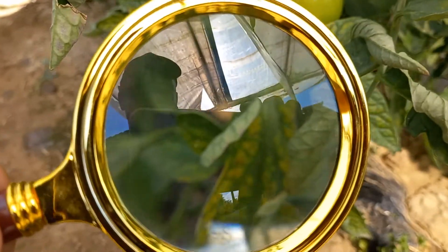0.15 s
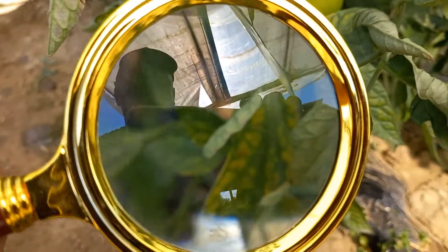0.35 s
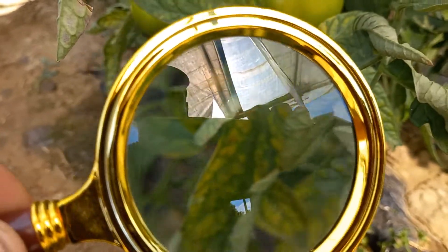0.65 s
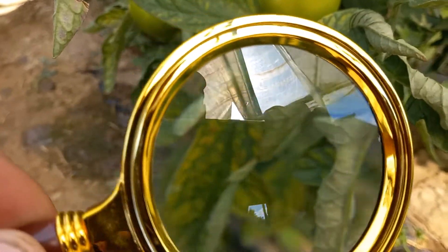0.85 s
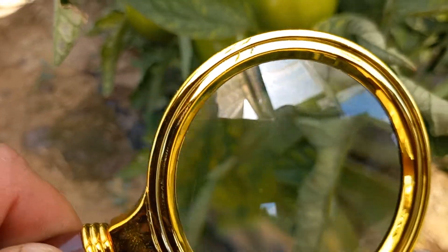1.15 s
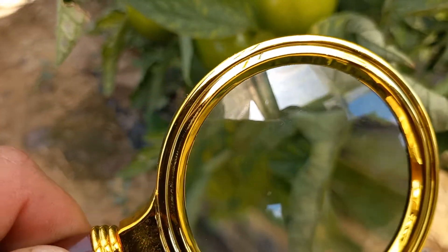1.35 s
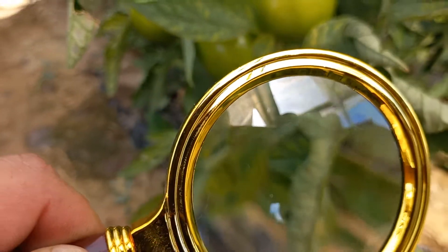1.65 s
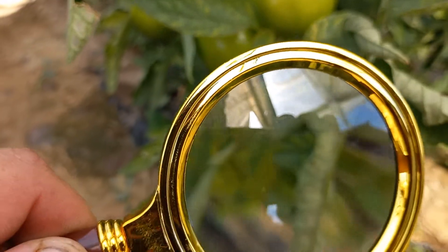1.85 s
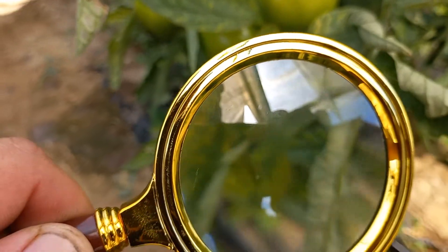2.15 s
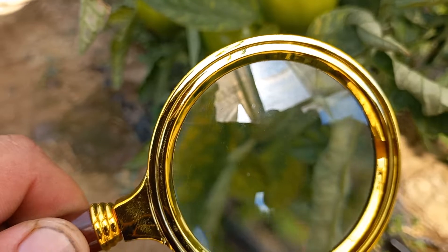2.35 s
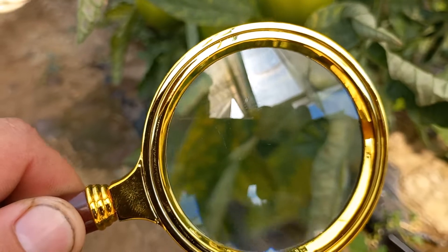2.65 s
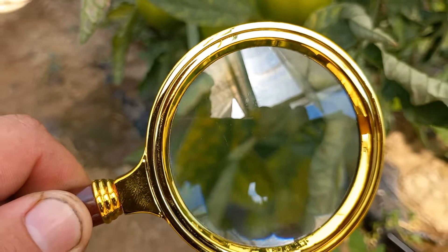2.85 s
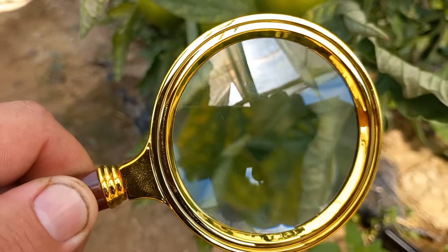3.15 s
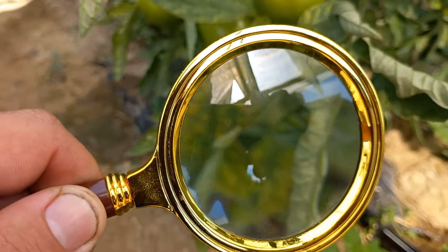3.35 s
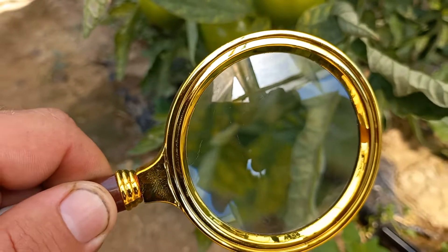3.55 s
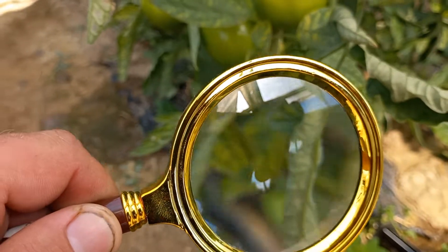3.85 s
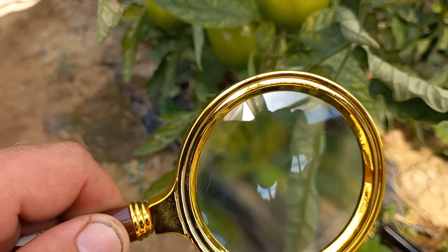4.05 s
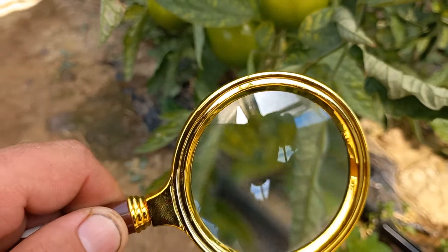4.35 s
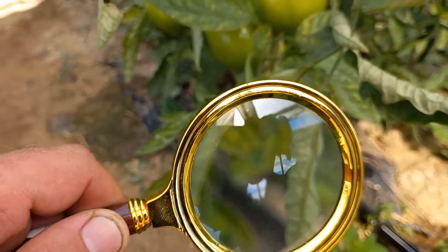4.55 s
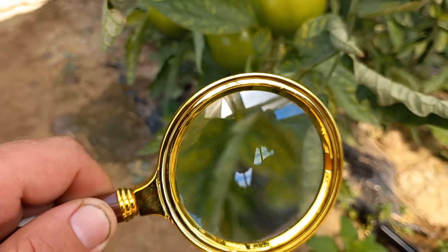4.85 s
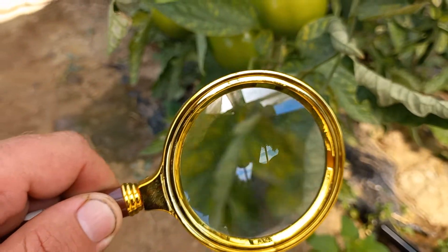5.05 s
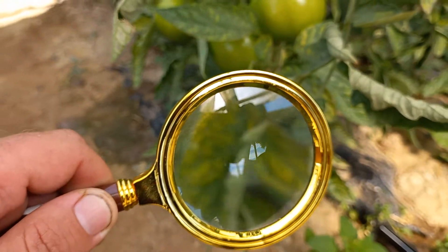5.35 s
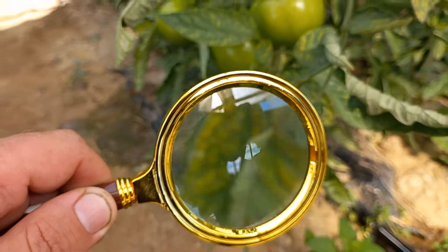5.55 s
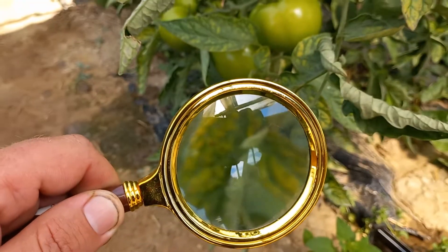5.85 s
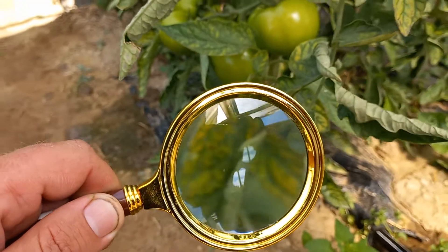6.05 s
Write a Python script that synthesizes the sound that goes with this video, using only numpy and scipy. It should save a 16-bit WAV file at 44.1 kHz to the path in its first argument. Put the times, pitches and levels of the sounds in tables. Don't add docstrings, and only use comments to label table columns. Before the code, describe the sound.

Open field with a light wind. From the start a distant diesel drones low, around 137 hertz, fluttering and fading on moving air; it slows gradually, faster after 3.5 seconds, ending near 99. A second idling engine and a low pump hum blend in early, then sink away. Insects whine thinly, air hisses softly, and dry leaves tick with tiny twig snaps. A small bird gives a very short high falling chirp at 0.3, 1.8, 2.6, 3.6, 4.6 and 5.4 seconds, each with a brief diffuse echo; the last is brightest. Tiny rod pips sound at 0.7, 1.4, 4.0 and 5.0. Gusts rustle foliage from 2.6, strongest near 3.5. Distant dull metal thuds and clatters cluster from 2.5 to 5, with deep knocks near 3.8. A faint belt squeal climbs at 4.1, 4.75 and 5.2. The left side is duller and slightly delayed.

```python
import sys
import numpy as np
from scipy import signal
from scipy.fft import rfft, irfft, next_fast_len
from scipy.io import wavfile
from scipy.ndimage import uniform_filter1d

SR = 44100
rng = np.random.default_rng(int(sys.argv[2]) if len(sys.argv) > 2 else 0)


def elevation(decibels):
    levels = np.asarray(decibels, float)
    return 10 ** (levels / 20)


def waveform_to_disk(signal):
    frames = np.transpose(np.atleast_2d(signal))
    scaled = np.clip(frames, -1, 1) * 32767
    samples = np.round(scaled).astype(np.int16)
    wavfile.write(sys.argv[1], SR, samples)


N = 273420
TIME = np.arange(N) / SR


def evened(x):
    return x / np.sqrt(np.mean(x ** 2) + 1e-20)


def smoothed_noise(shape, span):
    return evened(uniform_filter1d(uniform_filter1d(rng.standard_normal(shape), span), span))


def read(points, hz):
    f, value = np.transpose(points)
    return np.interp(np.log(hz + 1), np.log(f + 1), value)


def columns(rows, t=TIME):
    s, *values = np.transpose(rows)
    return [np.interp(t, s, v) for v in values]


def swells(rows):
    s, length, *dbs = np.transpose(rows)[:, :, None]
    t = TIME[::64]
    bell = np.exp(-(2 * (t - s) / length) ** 2)
    return [np.interp(TIME, t, (db * bell).sum(0)) for db in dbs]


def wander(top_hz, low_hz=0.288):
    hz = np.geomspace(low_hz, top_hz, 16)[:, None]
    t = TIME[::64]
    slow = (np.sin(2 * np.pi * (hz * t + rng.random(hz.shape))) / np.sqrt(hz)).sum(0)
    return np.interp(TIME, t, evened(slow))


def ring(x, hz, width):
    pole = np.exp((2j * np.pi * hz - np.pi * width) / SR)
    top = 2 * (1 - abs(pole)) * np.array([1, -pole.real])
    bottom = [1, -2 * pole.real, abs(pole) ** 2]
    return evened(signal.lfilter(top, bottom, signal.lfilter(top, bottom, x)))


def whistle(hz, db):
    hz, db = uniform_filter1d(hz, 100), uniform_filter1d(db, 100)
    return np.sqrt(2) * elevation(db) * np.sin(2 * np.pi * np.cumsum(hz) / SR)


def add(mix, s, sound):
    part = mix[:, round(s * SR):][:, :sound.shape[1]]
    part += sound[:, :part.shape[1]]


# pitch_hz, likeness (0 to 1)
SAME = [(40, 0.86), (300, 0.93), (470, 0.67), (620, 0.69), (900, 0.1), (1300, 0.17), (1600, 0.25),
        (16000, .03)]


def wash(spectrum, patchy_db, alike=1):
    frames, hz = N // 256 + 5, np.fft.rfftfreq(1024, 1 / SR)
    a, b, c, d, patches = rng.standard_normal((frames, 513, 5)).T
    patches = evened(uniform_filter1d(uniform_filter1d(patches, 8, 0), 14, 1))
    same = alike * np.clip(read(SAME, hz), 0, 1)[:, None]
    right = a + 1j * b
    left = same * right + np.sqrt(1 - same ** 2) * (c + 1j * d)
    inside = (hz >= spectrum[0][0]) & (hz <= spectrum[-1][0])
    shape = elevation(read(spectrum, hz)[:, None] + patchy_db * patches) * inside[:, None]
    z = np.array([left, right]) * shape
    return evened(signal.istft(z, nperseg=1024, noverlap=768)[1][:, :N])


def bursts(rows, rise, lumpy_db):
    out, t = np.zeros((2, N)), TIME[:SR // 2]
    for s, db, hz, width, t60 in rows:
        air = rng.standard_normal((2, len(t)))
        lumps = evened(uniform_filter1d(rng.standard_normal(len(t)), 400))
        same = np.clip(read(SAME, hz), 0, 1)
        air[0] = same * air[1] + np.sqrt(1 - same ** 2) * air[0]
        puff = ring(air, hz, width) * elevation(lumpy_db * lumps)
        add(out, s - rise, puff * elevation(db - 60 * t / t60) * np.minimum(t / rise, 1) ** 2)
    return out


def order(firing_hz, k, drift, flutter_db):
    phase = 2 * np.pi * k * np.cumsum(firing_hz) / SR
    phase += drift * np.sqrt(k) * wander(14, low_hz=1.5) + 7 * rng.random()
    return np.sqrt(2) * np.sin(phase) * elevation(flutter_db * wander(22, low_hz=3.5))


# time_s, firing_hz
FIRING = [(0, 137), (.25, 133.9), (.45, 130.1), (.8, 129.3), (1.5, 126.5), (2.4, 125.2), (3.2, 124.2),
          (3.8, 118.4), (4.3, 114.6), (5, 108.8), (5.6, 101.8), (6.2, 99.05)]
# time_s, tone_level_db, octave_against_tone_db
CARRY = [(0, -35, -6), (.3, -50.5, 3.5), (.55, -34, -1), (.76, -35, -6), (.95, -42.5, 2), (1.2, -34, -1),
         (1.4, -38.5, 3.5), (1.8, -45, -2.5), (2.3, -49.5, -6.5), (2.7, -39.5, -4), (3.1, -39.5, 0),
         (3.4, -45.5, -3.5), (3.75, -27.5, -3), (4.05, -28, -10), (4.62, -36.5, -2), (5.1, -39, -6),
         (5.55, -44.5, -5.5), (6.2, -42.5, -6.5)]
# centre_s, length_s, tone_db, octave_db
BEADING = [(.19, 0.036, 5, 9), (.66, .06, -9.5, -18), (.77, 0.077, 5.5, 11), (1.1, .05, -8, 3.5),
           (1.23, 0.1, 0.5, -4.5), (2.4, 0.045, -22, -3), (2.48, .07, 5, 10.5), (2.63, 0.16, -10, 5),
           (2.79, 0.043, 10, 11.5), (2.99, 0.054, -8, 0), (3.06, 0.063, 9.5, 12), (3.11, 0.055, -14, 7.5),
           (3.22, 0.11, 10, -2), (3.56, 0.066, 6, -4.5), (3.9, .04, -1, -10.5), (4.01, 0.043, 0.5, -11.5),
           (4.14, 0.11, -3, -10), (4.45, 0.21, -3, -16), (4.3, 0.049, -0.5, 2), (4.67, 0.024, -15.5, -8),
           (4.97, 0.051, 4.5, 1), (5.06, 0.038, -3, -5), (5.16, 0.09, 4.5, 8.5), (5.5, 0.05, -11, -8),
           (6.18, 0.1, 12, 10),
           (0.131, 0.04, -7, 3), (0.222, 0.04, -11.5, -3.5), (0.26, 0.04, 11.5, -10.5),
         (0.319, 0.04, -5, 8.5), (0.462, 0.055, 5, 9), (0.614, 0.14, 0, -5), (0.709, 0.06, -1.0, 10.5),
         (0.88, 0.04, 1, 7), (1.019, 0.033, 9, -3.0), (1.079, 0.04, -8.0, -0.5), (1.24, 0.14, 0.5, 2.5),
         (1.324, 0.04, -10.5, 1), (1.37, 0.04, 8, 1.5), (1.449, 0.04, 7.0, 2.5), (1.499, 0.06, -5.5, -4),
         (1.812, 0.034, 8, -4.0), (1.888, 0.04, -9.0, -9), (2.022, 0.06, -8.5, 0), (2.097, 0.072, 6, 8.5),
         (2.274, 0.067, -12, -2), (2.421, 0.04, -11.0, 5.0), (2.596, 0.14, -6.5, 3.0),
         (2.68, 0.04, 10, 0.0), (2.748, 0.06, -3.0, 10), (2.849, 0.09, 4.5, -9.5), (2.94, 0.048, -7.5, 0.5),
         (3.018, 0.04, 7, -1.5), (3.11, 0.06, -4.0, -3.0), (3.362, 0.04, 3, 9.0), (3.734, 0.043, 0.0, 4),
         (3.87, 0.04, 5.0, 3), (3.916, 0.04, -2.0, 6.5), (4.131, 0.05, 1.5, 6.5), (4.534, 0.06, -4, -4.0),
         (4.589, 0.04, 6.5, 1.5), (5.08, 0.036, 6, 5.0), (5.303, 0.038, -4, 8.5), (5.48, 0.04, -8, 5.0),
         (5.81, 0.035, 6.5, 6), (6.118, 0.14, -4.5, 0)]
# multiple_of_firing, under_octave_db
UPPER = [(3, -23), (4, -33.5), (5, -33)]
# centre_s, length_s, level_db
FACING = [
    (.45, .1, -8.5),
    (.72, .08, -6),
    (.55, .2, 5.5),
    (1.7, 0.42, 4),
    (3.1, 0.37, 3.5),
    (4.2, 0.31, 3.5),
    (4.6, 0.16, 5),
    (5.35, 0.27, 9.5),
    (5.7, 0.39, 12.5),
]
# sixths_of_firing, level_db
SIXTHS = [(5, 0), (7, -2), (8, -6), (9, -2), (10, -0.5), (11, 1), (13, -5)]
# centre_s, length_s, uneven_orders_db
LABOUR = [(.35, 0.65, -8), (1.2, 0.3, -10), (2.68, 0.09, 4.5), (2.96, 0.067, 1), (3.4, 0.074, 8.5),
          (3.62, 0.21, 9), (3.76, 0.15, 11), (3.92, 0.15, 13), (4.1, 0.14, 4.5), (4.33, 0.12, 3.5),
          (5.16, 0.083, 6), (.7, 0.36, -1.5), (3.17, 0.26, 4), (5.6, .3, 1.5), (4.8, .4, 4), (5.9, 0.38, 3)]


def slowing_engine():
    hz, = columns(FIRING)
    carry_db, bright_db = columns(CARRY)
    tone_beading, octave_beading = swells(BEADING)
    tone_db, octave_db = carry_db + tone_beading, carry_db + bright_db + octave_beading
    uneven_db = -55 + 0.22 * (carry_db + 39.5) + 1.5 * wander(7.3) + swells(LABOUR)[0]
    upper_db = octave_db + swells(FACING)[0]
    out = elevation(tone_db - 1.5) * order(hz, 1, .32, 1.3)
    out += elevation(octave_db - 3) * order(hz, 2, .22, 1.8)
    out += elevation(upper_db) * sum(elevation(db) * order(hz, k, .4, 2.5) for k, db in UPPER)
    return out + elevation(uneven_db) * sum(elevation(db) * order(hz, k / 6, .8, 3) for k, db in SIXTHS)


# time_s, firing_hz, level_db
IDLER = [(0, 141.2, -51.5), (.15, 145.1, -55.5), (.32, 148.7, -55), (.4, 138.6, -53.5), (.5, 131.2, -49.5),
         (.9, 134, -59.5), (1.2, 136.8, -48.5), (1.5, 138.3, -54.5), (1.8, 136.9, -62), (2.3, 132.5, -66.5),
         (2.6, 132.3, -50), (2.9, 129.2, -55.5), (3.2, 130.2, -49), (3.5, 130.5, -75), (4.4, 131.8, -72),
         (4.6, 135.2, -63), (5, 131.8, -76.5), (6.2, 134, -92)]
# multiple_of_firing, level_db
IDLER_ORDERS = [(1, 5), (2, 7), (3, -10.5), (4, -7.5)]


def idling_engine():
    hz, level_db = columns(IDLER)
    return elevation(level_db) * sum(elevation(db) * order(hz, k, .2, 2.2) for k, db in IDLER_ORDERS)


# time_s, pitch_hz, level_db
PUMP = [(0, 212, -48), (.6, 211, -46), (.9, 210, -45), (1.1, 210, -50), (1.5, 208, -62), (6.2, 204, -70)]


def pump():
    hz, db = columns(PUMP)
    return elevation(db - 4) * order(hz, 1, 0.26, 0.98)


# time_s, strength_db
WIND = [(0, -0.5), (.9, 0.5), (1.33, 1.5), (1.76, 0), (2.15, -3.5), (2.5, 0), (2.63, 3.5), (2.98, -0.1),
        (3.13, 5), (3.32, 0.5), (3.55, 3.5), (3.83, 5), (4.2, 2.5), (4.55, 3), (4.8, -0.4), (5.5, -1),
        (5.8, -0.5), (6.2, 2)]
# pitch_hz, density_db
RUMBLE = [(12, -56), (20, -39.5), (70, -16.5), (106, 7), (123, -1), (169, -14), (225, -8.5), (346, -14.5),
          (393, -16), (634, -22.5), (767, -35.5), (900, -32), (1170, -64.5), (1980, -120)]


def rumble():
    wind_db, = columns(WIND)
    _, idle_db = columns(IDLER)
    return elevation(-46.5 + 0.82 * wind_db + 0.13 * (idle_db + 59)) * wash(RUMBLE, 1.5)


# pitch_hz, density_db
ROAR = [(410, -25), (700, -4.5), (780, -6.5), (974, 1), (1060, 0), (1900, 2), (2200, -3), (2420, -15.5),
        (3200, -31.5), (4160, -38.5), (7040, -120)]


def roar():
    wind_db, = columns(WIND)
    return elevation(-60 + wind_db) * wash(ROAR, 1.42)


# pitch_hz, density_db
RUSH = [(1350, -40.5), (2300, -2), (3320, -7.5), (3600, -9), (4050, -12.5), (5730, -13.5), (7710, -15),
        (12000, -24.5), (15600, -53), (22000, -120)]
# peak_s, peak_db, rise_s, t60_s
RUSTLES = [
    (.92, -76, 0.018, 1.6),
    (1.8, -76, .03, 1.02),
    (2.62, -71, .08, 2.7),
    (3.2, -69.5, .1, 5.4),
    (3.54, -61.5, 0.071, 3.7),
    (4.29, -68, 0.07, 0.34),
    (4.55, -80, .03, 0.73),
    (5.4, -84, .04, 1.07),
]
# centre_s, length_s, level_db
LULLS = [
    (4.46, 0.23, -2.5),
    (4.15, .15, 0.5),
    (5.6, 0.26, 3),
]


def rush():
    wind_db, = columns(WIND)
    power = elevation(2 * (-76 + 0.97 * wind_db))
    for s, db, rise, t60 in RUSTLES:
        onset = np.clip(1 + (TIME - s) / rise, 0, 1) ** 4
        power += elevation(2 * db - 120 * np.maximum(TIME - s, 0) / t60) * onset
    return np.sqrt(power) * elevation(swells(LULLS)[0]) * wash(RUSH, 1.6)


# pitch_hz, density_db
INSECT_BED = [(6300, -21), (6900, -5.5), (7700, -4), (8600, -4.5), (9800, -3), (10200, -35.5)]
# pitch_hz, width_hz, level_db
WHINES = [
    (1631, 14, -77),
    (2168, 9, -75),
    (7115, 8, -89),
    (7715, 60, -86),
    (9980, 80, -85),
]
# time_s, level_db
CHORUS = [(0, 1), (1.5, 3), (1.9, -2), (3.4, -1.5), (4.3, 1.5), (4.5, 3), (5.3, 4), (5.6, 2.5), (6.2, -2)]


def insects():
    air = rng.standard_normal((2, N))
    effort_db, = columns(CHORUS)
    out = elevation(-77 + .3 * effort_db) * wash(INSECT_BED, 1.1)
    for hz, width, db in WHINES:
        waver_db = 2.5 * wander(70, low_hz=12) - 2 if hz > 7500 else 2 * wander(5.9)
        out += elevation(db + waver_db + effort_db * (hz > 5000)) * ring(air, hz, width)
    return out


# peak_s, peak_db, centre_hz, width_hz, t60_s
TICKS = [(.05, -64, 7300, 1800, 0.25), (0.115, -58, 8400, 1800, 0.16), (0.185, -63.5, 7100, 3000, 0.16),
         (0.3381, -60.5, 8200, 3000, 0.14), (0.5046, -61, 7670, 2920, 0.19),
         (0.9223, -59, 8200, 3000, 0.21), (0.9891, -54, 9240, 3000, 0.19), (1.7988, -65.5, 5539, 3028, 0.5),
         (2.6294, -59, 5750, 1200, 0.16), (3.5398, -63, 9200, 1500, .4), (3.545, -66.5, 5600, 2520, 0.45),
         (3.61, -64.5, 5196, 3000, .6), (4.2757, -57, 10500, 2000, 0.35), (4.275, -61.5, 6805, 2480, 0.25),
         (5.4, -63.5, 4970, 1610, 0.37), (5.7666, -55.5, 9400, 3002, 0.16),
         (5.9785, -62.5, 7990, 3020, 0.18), (6.185, -60, 8200, 1500, .14)]


def leaf_ticks():
    return elevation(-5) * bursts(TICKS, .02, 2)


# start_s, peak_db, pitch_hz, t60_s
SNAPS = [
    (.1216, -61.5, 8610, .03),
    (.339, -64.5, 8620, .02),
    (.506, -66, 7700, .03),
    (.924, -65, 9500, .02),
    (0.99, -63, 9958, .03),
    (3.539, -64.5, 9400, .05),
    (4.2755, -60.5, 9870, .04),
    (4.279, -61, 11800, .03),
    (5.7666, -61.5, 9330, .03),
]


def snaps():
    out, t = np.zeros((2, N)), TIME[:2000]
    for s, db, hz, t60 in SNAPS:
        add(out, s, elevation(db - 60 * t / t60) * ring_once(rng.standard_normal((2, len(t))), hz, 1500))
    return out


def ring_once(x, hz, width):
    pole = np.exp((2j * np.pi * hz - np.pi * width) / SR)
    top = 2 * (1 - abs(pole)) * np.array([1, -pole.real])
    return evened(signal.lfilter(top, [1, -2 * pole.real, abs(pole) ** 2], x))


def voice(shape, t, hz, db, unsteady_db):
    unsteady, tremble = smoothed_noise((2, len(t)), 200)
    sounding = (t > shape[0][0]) & (t < shape[-1][0])
    tremble_hz_per_s = 450
    return whistle(hz + tremble_hz_per_s * t * tremble, db + unsteady_db * unsteady) * sounding


def echoes(x, t60, gap, hold):
    t = np.arange(SR // 3) / SR
    fall_db = -60 * np.maximum(t - hold, 0) / t60
    signs = rng.choice([-1., 1.], (2, len(t)))
    taps = signs * (rng.random((2, len(t))) < .08) * elevation(fall_db) * (t > gap)
    return signal.oaconvolve(x[None], taps / np.linalg.norm(taps[0]), axes=1)[:, :len(x)]


def off_greenhouse(call, near_db, far_db, left_db, t60, hold):
    shimmer, span = .7, round(.0022 * SR)
    leaves = smoothed_noise(len(call), span)
    blurred = echoes(call * (np.sqrt(1 - shimmer ** 2) + shimmer * leaves), t60, 0.006, hold)
    direct = elevation(near_db) * call * elevation(np.array([[left_db - 5], [0]]))
    return direct + elevation(far_db) * blurred * elevation(np.array([[left_db + 1], [0]]))


# after_start_s, pitch_hz, level_db
HIGH_NOTE = [(0, 3726, -14), (.008, 3875, -8.5), (.018, 3852, -4), (.030, 3506, -3), (.036, 3557, -3.5),
             (.041, 3960, -0.5), (.046, 3780, -12.5), (.053, 3350, -25)]
# after_start_s, pitch_hz, level_db
LOW_NOTE = [(.047, 2970, -14.5), (.052, 3056, -6), (.060, 3263, 0.5), (.068, 3185, 0.5), (.075, 3020, -1),
            (.081, 2910, -10.5)]
# after_start_s, pitch_hz, level_db
SLIDE = [(.076, 2990, -8.5), (.081, 2810, -1.5), (.088, 2660, 1.5), (.097, 2460, -7.5), (.107, 2220, -2),
         (.118, 2050, -18.5)]
# start_s, high_db, low_db, high_echo_db, low_echo_db
CHIRPS = [
    (.337, -58, -74, -59, -56.5),
    (1.806, -53.5, -55, -57, -61),
    (2.644, -59.5, -57, -55.5, -58),
    (3.618, -59.5, -59, -60.5, -60),
    (4.566, -63, -54, -60, -57),
    (5.412, -47, -59, -57, -57.5),
]
# direct_db, echo_db, high_note_dip (depth), slide_reach (share)
SLIDES = [
    (-73, -65, .55, .5),
    (-74, -63, .85, 0.4),
    (-59, -60, 1.3, .75),
    (-56, -59.5, .3, 1.05),
    (-59, -61.5, 1.1, 0.7),
    (-58, -61, 0.95, .3),
]
# low_rise_hz, low_swell_db, unsteady_db, high_echo_t60_s, low_echo_t60_s
MANNER = [
    (0, 0, 2., .45, 0.37),
    (40, 1, 2, 0.34, 0.31),
    (-60, 2, 3., .33, .4),
    (-300, 5, 3, .33, 0.45),
    (-50, 11, 2.5, .36, 0.24),
    (-30, 5.5, 1, 0.26, .2),
]
# high_shift_hz, low_shift_hz, low_arch (depth)
PITCHES = [
    (0, -60, 1.),
    (1, 20, .6),
    (-69, 0, .9),
    (0, 0.5, 1.),
    (-61, -60, 1.1),
    (0, -59.5, .7),
]


def bird():
    out, t = np.zeros((2, N)), TIME[:SR // 2]
    high_curve, high_swell = columns(HIGH_NOTE, t)
    low_curve, low_swell = columns(LOW_NOTE, t)
    slide_curve, slide_swell = columns(SLIDE, t)
    low_start, low_end = LOW_NOTE[0][0], LOW_NOTE[-1][0]
    along = np.clip((t - low_start) / (low_end - low_start), 0, 1) - .5
    for chirp, slide, manner, pitch in zip(CHIRPS, SLIDES, MANNER, PITCHES):
        s, high_db, low_db, high_far_db, low_far_db = chirp
        slide_db, slide_far_db, dip, reach = slide
        rise_hz, swell_db, unsteady_db, high_t60, low_t60 = manner
        high_shift, low_shift, arch = pitch

        hz = 3820 + high_shift + dip * (high_curve - 3820)
        call = voice(HIGH_NOTE, t, hz, high_swell, unsteady_db)
        add(out, s, off_greenhouse(call, high_db, high_far_db, -10, high_t60, .045))

        hz = 3120 + low_shift + arch * (low_curve - 3120) + rise_hz * along
        call = voice(LOW_NOTE, t, hz, low_swell + swell_db * along, unsteady_db)
        add(out, s, off_greenhouse(call, low_db, low_far_db, -6.5, low_t60, .025))

        hz = 3020 + reach * (slide_curve - 3020)
        call = voice(SLIDE, t, hz, slide_swell, unsteady_db)
        add(out, s, off_greenhouse(call, slide_db, slide_far_db, -6.5, low_t60, .02))
    return out


# between_notes_db, under_slide_db
HAZE = [
    (-64, -62),
    (-63, -63),
    (-64, -66),
    (-66, -59),
    (-61, -60),
    (-59, -61),
]


def haze():
    rows = []
    for (s, *_), (mid_db, low_db) in zip(CHIRPS, HAZE):
        rows.append((s + .048, mid_db, 3380, 260, .33))
        rows.append((s + .092, low_db, 2680, 420, .36))
    return bursts(rows, .012, 2.5) * elevation(np.array([[-5.], [0]]))


# centre_s, peak_db, pitch_hz, length_s
PIPS = [
    (.677, -46, 1700, .008),
    (1.418, -51, 1750, .008),
    (3.98, -55, 1700, .012),
    (5.048, -51, 1800, .013),
]


def pips():
    s, db, hz, length = np.transpose(PIPS)[:, :, None]
    bell = np.exp(-(3 * (TIME - s) / length) ** 2)
    return (elevation(db) * bell * np.sin(2 * np.pi * hz * TIME)).sum(0)


# centre_s, length_s, over_rest_db
SINGING = [
    (1.35, 0.44, 14),
    (1.7, .25, 13),
    (2.62, .25, 14),
    (3.17, .12, 15),
    (3.9, .4, 12),
    (6.1, .3, 10),
]


def singing():
    return elevation(-81.5 + swells(SINGING)[0]) * ring(rng.standard_normal((2, N)), 1750, 500)


# peak_s, peak_db, centre_hz, width_hz, t60_s
KNOCKS = [(2.999, -51, 1270, 490, 0.61), (2.8, -62, 1800, 650, 0.79), (3.06, -53.5, 1700, 370, 0.73),
          (3.06, -49.5, 550, 420, 0.88), (4, -46.5, 215, 77, 0.7), (3.69, -48.5, 370, 53, 0.69),
          (3.77, -43, 340, 65, 0.41), (3.4, -51, 350, 66, 0.97), (4.45, -55.5, 1180, 460, 1.1),
          (3.3, -63, 1800, 390, .7), (4.455, -55, 914, 220, 0.87), (4.46, -52, 520, 150, 0.4),
          (4.535, -54.5, 1200, 190, 0.44), (4.5, -59.5, 390, 31, 1.45), (4.92, -53, 400, 19, 1.8),
          (2.52, -49, 390, 40, 2.9), (3.885, -38, 188, 39, 1.1), (3.84, -43, 74, 29, 1.5),
          (4.26, -44.5, 62, 25, .8), (3, -49, 62, 25, 0.55), (4.72, -47.5, 65, 27, 1.2),
          (5.55, -50, 160, 41, 1.1), (3.02, -63.5, 2150, 400, .8), (3.12, -55, 1100, 630, .6),
          (3.15, -49, 390, 69, 0.88), (3.66, -44.5, 270, 80, 0.82), (3.8, -40, 200, 60, 0.82),
          (3.42, -46, 190, 57, .9), (3.17, -57, 1900, 500, .5), (2.84, -53.5, 600, 120, 0.86),
          (4.8, -49.5, 59, 20, .6)]
# peak_s, peak_db, centre_hz, width_hz, t60_s
CLATTER = [
    (3.066, -54, 2000, 350, .3),
    (3.1, -53.5, 1500, 250, .25),
    (3.09, -55, 850, 300, .6),
    (3.23, -52.5, 620, 110, .5),
]


def metal_knocks():
    return bursts(KNOCKS, .009, 2.2) + bursts(CLATTER, .006, 2.2)


# start_s, length_s, from_hz, to_hz, level_db
SQUEALS = [
    (4.078, 0.59, 651, 753, -65),
    (4.75, 0.36, 723, 801, -65),
    (5.191, 0.1407, 659, 742, -68),
]


def squeals():
    out = np.zeros(N)
    tremble, grip_db = wander(14, low_hz=3.2), 3 * wander(13, low_hz=2.4)
    for s, length, from_hz, to_hz, db in SQUEALS:
        u = np.clip((TIME - s) / length, 0, 1)
        hz = from_hz + (to_hz - from_hz) * u + 40 * tremble
        out += whistle(hz, db + grip_db) * np.sin(np.pi * u) ** 0.5 * (u < 1)
    return out


# pitch_hz, level_db
SHADE = [(40, 0), (300, 0.5), (500, -2.5), (800, 1.5), (1100, -12.5), (1300, -5.5), (1900, -14.5),
         (2600, -10), (3300, -2), (4500, -11.5), (6500, -26), (10000, -27.5), (15000, -2)]
# pitch_hz, delay_samples
LAG = [(60, 12), (130, 17.7), (260, 13.8), (500, 16), (1000, 18.4), (16000, 23.8)]


def at_ports(field, calls):
    size = next_fast_len(N + 4096)
    hz = np.fft.rfftfreq(size, 1 / SR)
    left = rfft(field[0], size) * elevation(read(SHADE, hz)) + rfft(calls[0], size)
    left = left * np.exp(-2j * np.pi * hz * read(LAG, hz) / SR)
    return np.array([irfft(left, size)[:N], field[1] + calls[1]])


def scene():
    field = slowing_engine() + idling_engine() + pump()
    field = field + rumble() + roar() + rush() + insects()
    field += leaf_ticks() + snaps() + pips() + singing() + metal_knocks() + squeals()
    return at_ports(field, bird() + haze())


def roll_off(x):
    return signal.sosfilt(signal.butter(12, 15750, fs=SR, output="sos"), x)


# pitch_hz, density_db
SELF_NOISE = [(2500, -15), (4000, -2), (7000, -10), (10000, -2.5), (13000, 2), (16500, -3.5)]


def record(dry):
    hiss = elevation(-80) * wash(SELF_NOISE, 0, alike=0)
    bass_cut = signal.butter(4, 52, "high", fs=SR, output="sos")
    mix = signal.sosfilt(bass_cut, dry + hiss)
    return roll_off(mix)


dry = scene()
out = record(dry)
waveform_to_disk(out)
```